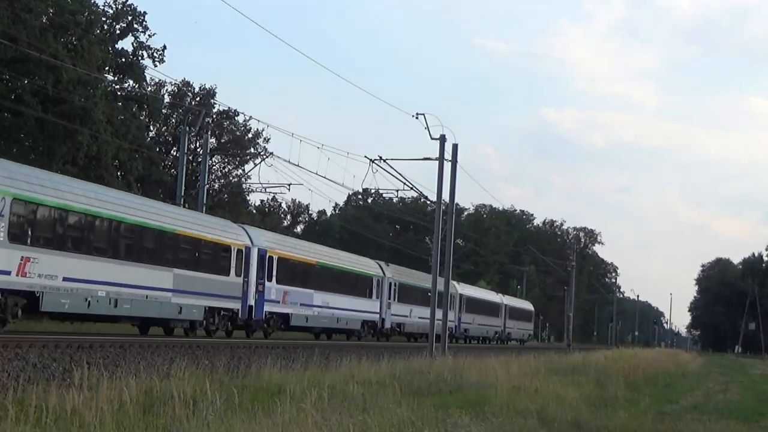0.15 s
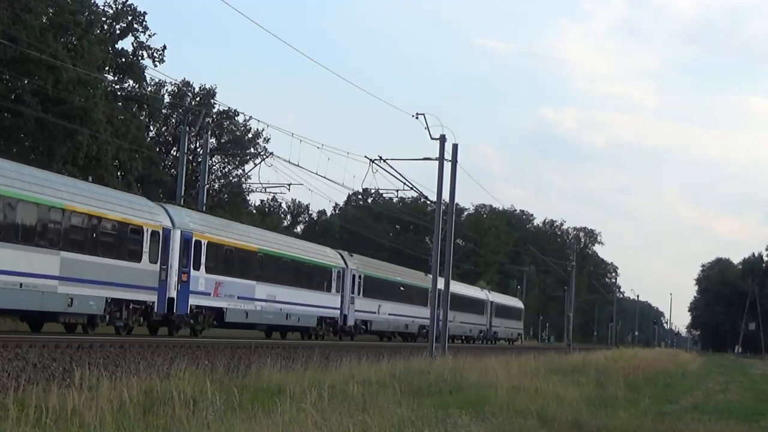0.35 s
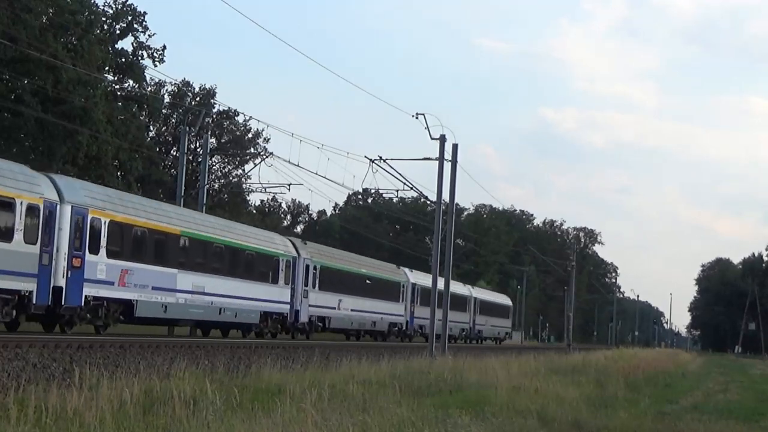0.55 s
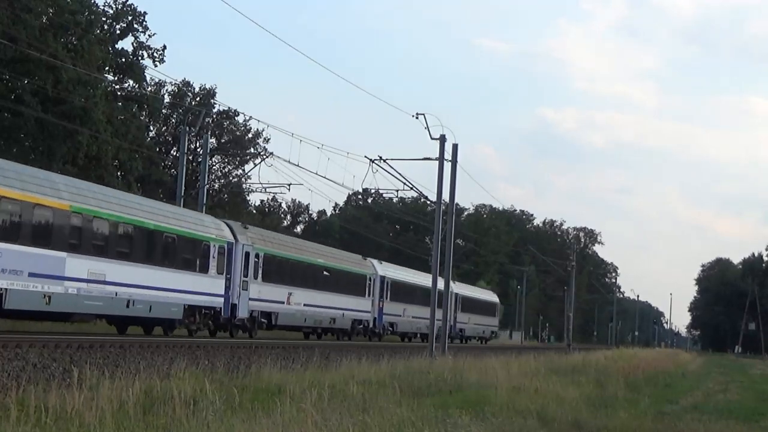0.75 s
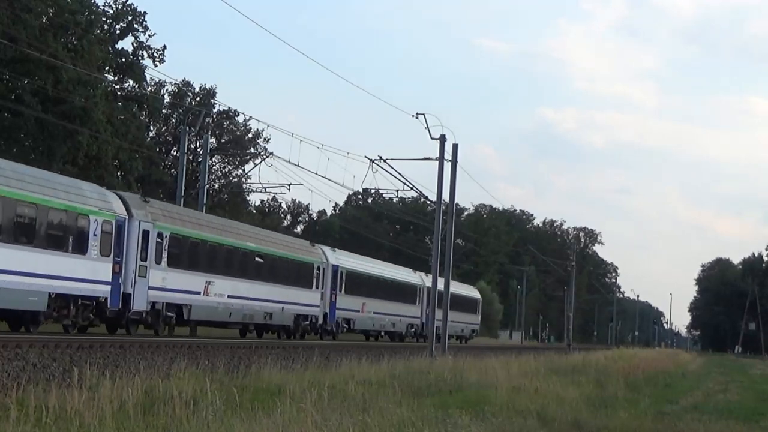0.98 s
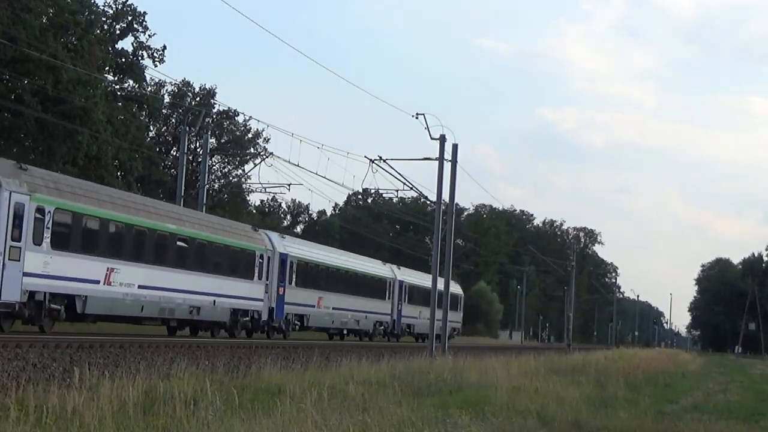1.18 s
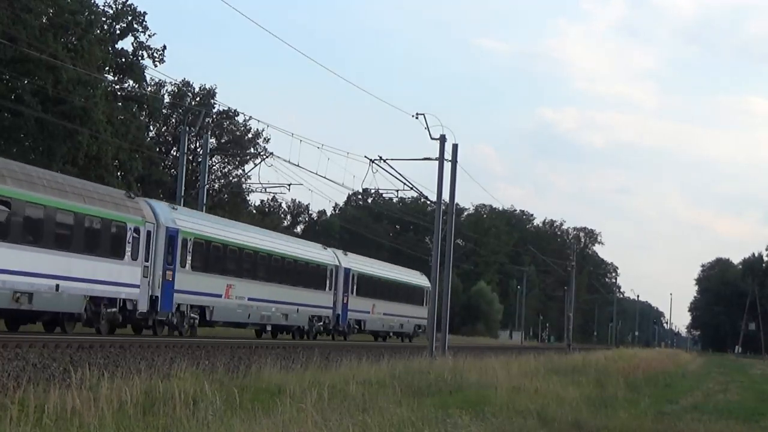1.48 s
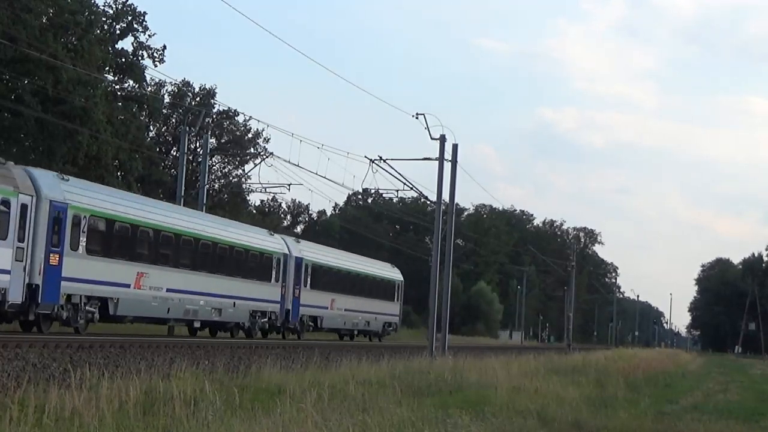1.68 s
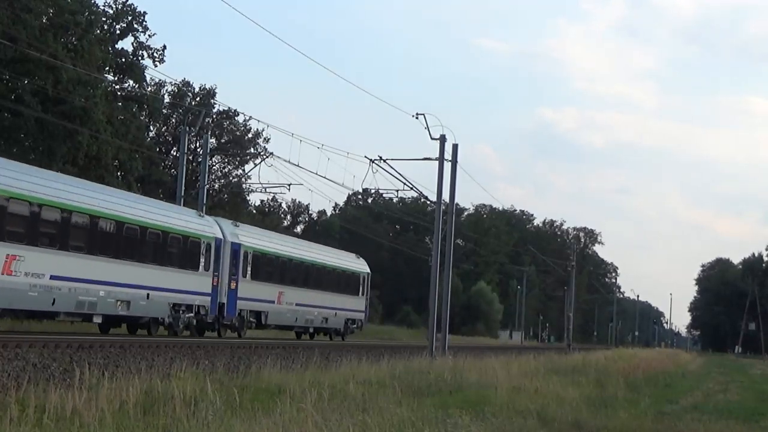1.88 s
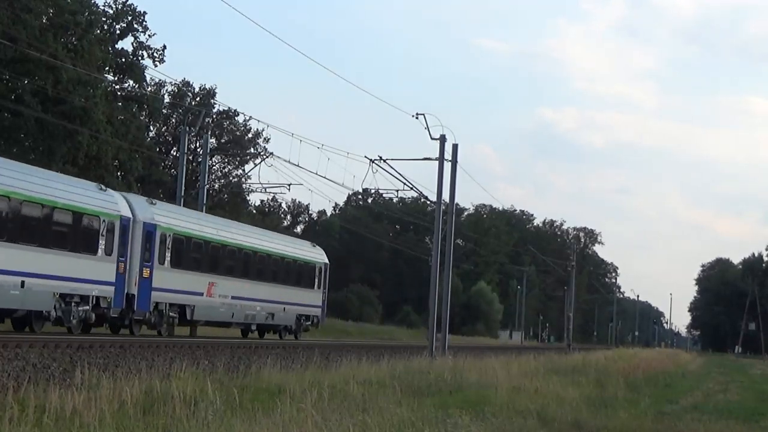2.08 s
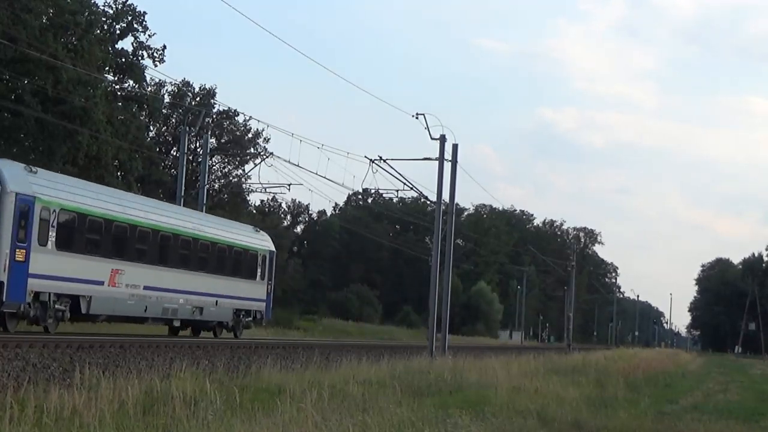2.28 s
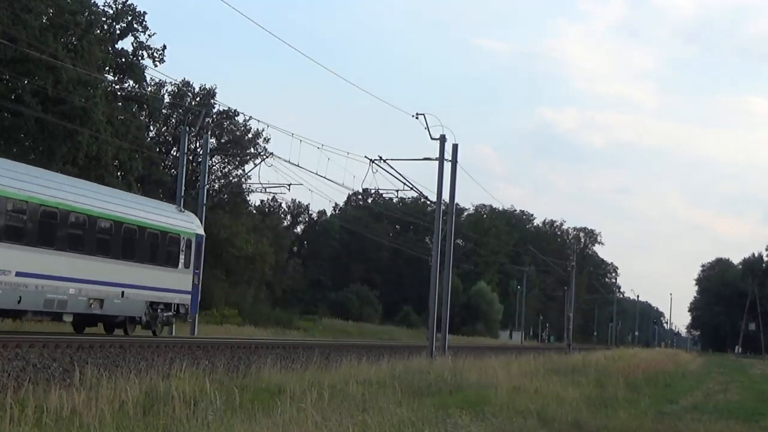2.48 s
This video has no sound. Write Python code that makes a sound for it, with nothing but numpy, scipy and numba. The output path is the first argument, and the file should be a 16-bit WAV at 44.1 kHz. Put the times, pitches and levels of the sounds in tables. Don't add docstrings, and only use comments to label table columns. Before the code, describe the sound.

Passenger coaches speed past close by outdoors, already loud at 0 s and roaring through to about 2.6 s. The bright, hissing wheel and rail noise has little deep rumble. Wheelsets ring metallically every tenth of a second or so, slightly falling in pitch, with rough grinding surges near 0.4, 1.0 and 2.0 s. Quick scuffs flutter throughout; air hisses strongest around 1.2-1.4 s. Stereo drifts left late, without silence.

```python
import sys
import numpy as np
from scipy import signal
from scipy.fft import rfft, irfft, next_fast_len
from scipy.io import wavfile
from scipy.ndimage import uniform_filter1d
from numba import njit

SR = 44100
rng = np.random.default_rng(int(sys.argv[2]) if len(sys.argv) > 2 else 0)


def transcribe(u):
    v = np.clip(np.atleast_2d(u).T, -1, 1)
    q = np.round(v * 32767).astype(np.int16)
    wavfile.write(sys.argv[1], SR, q)


def how_loud(loudness_db):
    steps = np.asarray(loudness_db, float) / 20
    return 10 ** steps


N = 116865

SPEED_M_S, TRACK_DISTANCE_M, SOUND_SPEED_M_S = 27.8, 12, 343

# [f/Hz, level/dB]
ROAR_SPECTRUM = [(20, -25.5), (290, -23), (440, -16), (1250, -6), (1700, -2), (2300, -1.5), (5340, -17),
                 (15600, -28.5)]
# [t/s, rail level/dB, wheel disc level/dB]
ROAR_LEVELS = [(0, -32.5, -32.5), (.14, -35, -33.5), (.2, -33, -32.5), (.45, -31, -30), (.62, -33.5, -30.5),
               (.8, -29.5, -30), (1.0, -30.5, -30.5), (1.18, -31, -33.5), (1.4, -30, -28), (1.6, -31, -29),
               (1.95, -30, -30.5), (2.1, -29.5, -30.5), (2.2, -30, -31), (2.33, -27, -31.5),
               (2.5, -29.5, -31.5), (2.65, -30.5, -31)]
ROAR_DB, SWELL_DB, FLICKER_DB, DISC_FLICKER_DB = 9.5, 0.72, 1.1, -0.4
CROSSOVER_HZ, MODAL_TOP_HZ = 1360, 3440

# [t/s, low ring f/Hz, low level/dB, high ring f/Hz, high level/dB]
WHEELSETS = [(.03, 1730, -52, 2294, -30), (.18, 1650, -36, 2315, -32.5), (.29, 1647, -28, 2300, -26),
             (.43, 1624, -25.5, 2327, -24.5), (.54, 1583, -26, 2245, -30), (.65, 1520, -26, 2104, -28),
             (.74, 1610, -34, 2460, -29), (.83, 1740, -26, 2170, -52), (.95, 1620, -24, 2390, -33),
             (1.07, 1598, -25.5, 2270, -32), (1.16, 1620, -30, 2255, -29), (1.33, 1580, -29, 2275, -28.5),
             (1.47, 1550, -29.5, 2155, -30), (1.61, 1564, -24, 2154, -30), (1.75, 1464, -25, 2245, -26.5),
             (1.88, 1617, -27, 2020, -33), (1.97, 1650, -25.5, 2180, -23.5), (2.08, 1440, -28.5, 2150, -29),
             (2.16, 1495, -27.5, 2394, -30), (2.28, 1380, -29.5, 1970, -29.5),
             (2.39, 1710, -34, 2260, -29.5), (2.50, 1316, -29, 2430, -31.5), (2.60, 1930, -34, 2380, -38)]
RING_WIDTHS = (95, 59)
WHEEL_BEAM_M = 2.36
RING_WAVER, RING_FLUTTER_DB = 0.0086, 1
STEADINESS, STEADY_S = 0.27, 0.021

# [t/s, f/Hz, level/dB]
LONE_MODES = [(.10, 2290, -42), (.17, 2340, -27), (.35, 2070, -29), (.36, 3100, -29), (.39, 2380, -33),
              (.66, 1490, -26), (.84, 1750, -28), (.55, 3000, -30.5), (.90, 2410, -28), (1.10, 2190, -30),
              (1.23, 2210, -25.5), (1.41, 2190, -33), (1.51, 2130, -27), (1.57, 2930, -35),
              (2.07, 2170, -31), (2.05, 2720, -30), (2.17, 1540, -26), (2.31, 2300, -28.5),
              (2.54, 2420, -29), (2.62, 1960, -31), (.39, 6400, -39), (1.03, 7400, -45), (1.22, 8900, -42),
              (1.96, 7200, -43), (.42, 4100, -33), (.44, 4400, -41), (.46, 3000, -27), (.51, 952, -32.5),
              (.79, 4150, -34), (.80, 650, -41), (.87, 3660, -38), (.89, 4400, -31), (1.00, 4350, -37),
              (1.02, 3900, -34), (1.04, 4100, -37), (1.05, 295, -45), (1.31, 3950, -39), (1.33, 332, -48.5),
              (1.45, 2790, -30), (1.54, 3300, -33), (1.70, 2740, -29), (1.70, 910, -38.5),
              (1.79, 790, -35.5), (1.85, 2800, -30), (1.92, 3280, -32), (1.95, 755, -35), (1.96, 2940, -37),
              (2.01, 4000, -36), (2.25, 2840, -33), (2.28, 980, -39), (2.35, 760, -41.5), (2.40, 3340, -32),
              (2.57, 3240, -29), (2.57, 450, -39), (2.58, 773, -41)]
FLARE_BEAM_M, FLARE_WIDTH = 1.14, 0.023

# [t/s, level/dB, beam/m, brightness/(dB per octave)]
ROUGH_BOGIES = [(.24, -29, 5.5, -8), (.42, -26.5, 3.7, 0), (.56, -36.5, 2.3, 26), (.80, -27, 3.6, -4),
                (.88, -35.5, 2.2, 7), (1.03, -24.5, 5.2, 6.5), (1.38, -27.5, 7.9, -3),
                (1.53, -38, 2.5, -17), (1.72, -32.5, 2.8, -32), (1.96, -26, 5, -1.5), (2.25, -26, 1.4, -22),
                (2.41, -30.5, 2.3, -3), (2.59, -26, 6.8, -1)]
# [f/Hz, width/Hz, level/dB]
GRIND_MODES = [(2660, 280, -4), (2977, 100, -4), (3520, 850, -2), (4155, 120, -7), (4710, 150, -10.5),
               (5550, 1300, -8), (6950, 600, -18.5)]
GRIND_FLUTTER_DB, BOGIE_SHUDDER_DB = 1.14, 1.37

# [t/s, scuff level/dB, hiss level/dB]
TREAD_STRIKES = [(.385, -42, -55), (.44, -42, -43), (.545, -34, -49), (.605, -38, -52), (0.701, -34, -45),
                 (.790, -35.5, -54), (.855, -33, -46), (.880, -45, -51), (.945, -36, -48),
                 (1.023, -32, -41), (1.121, -33.5, -42), (1.205, -35, -41), (1.265, -33, -36),
                 (1.335, -40, -39), (1.370, -38, -38), (1.440, -44, -44), (1.540, -38, -45),
                 (1.645, -38, -47), (1.775, -40, -41), (1.830, -35, -48), (1.95, -45, -53),
                 (2.238, -39.5, -48), (2.370, -38, -40), (2.520, -40, -50), (2.630, -41, -50)]
STRIKE_RISE_S, STRIKE_FALL_S, STRIKE_DB = 0.0052, 0.019, 9.5
SCUFF_HZ, SCUFF_WIDTH_HZ = 5630, 4200
HISS_HZ, HISS_WIDTH_HZ = 11400, 6700

# [t/s, level/dB, beam/m, centre f/Hz]
AIR_LEAKS = [
    (.66, -41.5, 3.4, 9000),
    (1.13, -39, 5, 9900),
    (1.24, -32.5, 2.6, 9700),
    (1.27, -43, 2, 12500),
    (1.36, -36, 2.9, 10100),
    (1.75, -51, 3.1, 9250),
    (2.30, -37, 5.0, 8650),
]
LEAK_WIDTH_HZ, LEAK_PAN_DB, LEAK_FLUTTER_DB = 6900, -3.5, 2

# [f/Hz, left minus right level/dB]
PORT_LEVELS = [(60, 5.5), (380, 0.5), (900, 6.5), (2400, 5), (3800, 6), (6000, 4.5), (8800, -1.5),
               (14000, 1.5)]
# [f/Hz, likeness/(0 to 1)]
PORT_COHERENCE = [(30, 0.61), (120, 0.7), (450, 0.99), (1300, 0.84), (2500, 0.82), (5000, 0.74),
                  (8000, 0.4), (9900, 0.84), (11700, 0.7)]
# [f/Hz, phase/rad]
PORT_LEAD = [(60, 0.57), (700, -0.28), (1200, 0.36), (1500, -0.88), (3300, -0.16), (6500, -0.69),
             (9000, -0.13), (15300, -.1)]
# [t/s, left minus right level/dB]
TRAIN_DRIFT = [(0, -0.5), (.6, 1.3), (1.3, 1), (1.8, 1.1), (2.2, 3), (2.65, 1.5)]
# [f/Hz, level/dB]
CAPSULE_RESPONSE = [(6000, 0.5), (8200, 3), (9900, 3.2), (10500, -0.5), (12500, -4), (14000, -2.5),
                    (15600, -5.5)]


def level(x, db):
    return x * how_loud(db) / np.sqrt(np.mean(x ** 2))


def by_hz(table, hz):
    table = np.array(table, float)
    return np.interp(np.log(np.maximum(hz, 1)), np.log(table[:, 0]), table[:, 1])


def walk(rate):
    hold = int(SR / rate)
    w = np.repeat(rng.standard_normal(N // hold + 1), hold)
    w = uniform_filter1d(uniform_filter1d(w, hold), hold)[:N]
    return w / w.std()


def passing(t, passes_s, beam_m):
    along_m = SPEED_M_S * (t - passes_s)
    recession_m_s = SPEED_M_S * along_m / np.hypot(along_m, TRACK_DISTANCE_M)
    pitch = 1 / (1 + recession_m_s / SOUND_SPEED_M_S)
    gain = (1 + (along_m / beam_m) ** 2 / 2) ** -2
    return pitch, gain


@njit
def svf(x, hz, width, sr):
    y = np.empty_like(x)
    for c in range(x.shape[0]):
        band, low = 0., 0.
        for i in range(x.shape[1]):
            g = np.tan(np.pi * hz[i] / sr)
            damping = width / hz[i]
            v = (band + g * (x[c, i] - low)) / (1 + g * (g + damping))
            band = 2 * v - band
            low = low + 2 * g * v
            y[c, i] = damping * v
    return y


def resonance(hz, width_hz):
    hz = np.clip(hz * np.ones(N), 20, SR / 2.3)
    noise = rng.standard_normal((2, N))
    narrow = svf(noise, hz, 1. * width_hz, 1. * SR)
    return level(svf(narrow, hz, 5.7 * width_hz, 1. * SR), 0)


def ring(hz, width_hz):
    x = resonance(hz, width_hz)
    k = int(STEADY_S * SR)
    power = uniform_filter1d(uniform_filter1d(x ** 2, k), k)
    return level(x / power ** (STEADINESS / 2), 0)


def rails(t):
    hz = np.fft.rfftfreq(N, 1 / SR)
    colour = how_loud(by_hz(ROAR_SPECTRUM, hz))
    noise = rfft(rng.standard_normal((2, N))) * colour / np.sqrt(np.mean(colour ** 2))
    s, rail_db, disc_db = np.array(ROAR_LEVELS).T
    swell = walk(rate=31)
    out = 0
    for centre in 20 * 2 ** np.arange(0, 10, 1 / 8):
        octaves = np.log2(np.maximum(hz, 20) / centre)
        share = np.cos(np.pi / 2 * np.clip(8 * octaves, -1, 1)) ** 2
        disc = 1 / (1 + (CROSSOVER_HZ / centre) ** 4)
        modal = 1 / (1 + (centre / MODAL_TOP_HZ) ** 2)
        db = ROAR_DB + np.interp(t, s, rail_db + disc * (disc_db - rail_db))
        db = db + (1 - modal) * SWELL_DB * swell
        db = db + modal * (FLICKER_DB + disc * DISC_FLICKER_DB) * walk(rate=15)
        out = out + irfft(noise * share, next_fast_len(N))[:, :N] * how_loud(db)
    return out


def wheels(t):
    out = 0
    for s, low_hz, low_db, high_hz, high_db in WHEELSETS:
        pitch, gain = passing(t, s, WHEEL_BEAM_M)
        for hz, db, width_hz in zip((low_hz, high_hz), (low_db, high_db), RING_WIDTHS):
            waver = 1 + RING_WAVER * walk(rate=18)
            loudness = gain * how_loud(db + RING_FLUTTER_DB * walk(rate=32))
            out = out + loudness * ring(hz * pitch * waver, width_hz)
    return out


def flares(t):
    out = 0
    for s, hz, db in LONE_MODES:
        pitch, gain = passing(t, s, FLARE_BEAM_M)
        out = out + gain * how_loud(db) * ring(hz * pitch, FLARE_WIDTH * hz + 40)
    return out


def bogies(t):
    out = 0
    lowest_hz = GRIND_MODES[0][0]
    for s, db, beam_m, tilt_db in ROUGH_BOGIES:
        pitch, gain = passing(t, s, beam_m)
        grind = 0
        for hz, width_hz, mode_db in GRIND_MODES:
            mode_db = mode_db + tilt_db * np.log2(hz / lowest_hz) + GRIND_FLUTTER_DB * walk(rate=14)
            grind = grind + how_loud(mode_db) * resonance(hz * pitch, width_hz)
        out = out + gain * how_loud(BOGIE_SHUDDER_DB * walk(rate=24)) * level(grind, db)
    return out


def treads(t):
    s, scuff_db, hiss_db = np.array(TREAD_STRIKES).T
    since = np.maximum(t - s[:, None] + STRIKE_RISE_S, 0)
    shape = (1 - np.exp(-since / STRIKE_RISE_S)) * np.exp(-since / STRIKE_FALL_S)
    scuff = how_loud(scuff_db + STRIKE_DB) @ shape * resonance(SCUFF_HZ, SCUFF_WIDTH_HZ)
    hiss = how_loud(hiss_db + STRIKE_DB) @ shape * resonance(HISS_HZ, HISS_WIDTH_HZ)
    return scuff + hiss


def leaks(t):
    out = 0
    for s, db, beam_m, hz in AIR_LEAKS:
        pitch, gain = passing(t, s, beam_m)
        flutter = LEAK_FLUTTER_DB * walk(rate=23)
        out = out + gain * how_loud(db + flutter) * resonance(hz * pitch, LEAK_WIDTH_HZ)
    return out


def ports(pair):
    hz = np.fft.rfftfreq(N, 1 / SR)
    common, differing = rfft(pair)
    like = np.clip(by_hz(PORT_COHERENCE, hz), 0, 1)
    mid = common * np.sqrt((1 + like) / 2)
    side = differing * np.sqrt((1 - like) / 2)
    tilt = how_loud(by_hz(PORT_LEVELS, hz) / 2) * np.exp(.5j * by_hz(PORT_LEAD, hz))
    return irfft(np.array([(mid + side) * tilt, (mid - side) / tilt]), N)


def pan(db):
    return how_loud(np.array([[.5], [-.5]]) * db)


def scene():
    t = np.arange(N) / SR
    train = ports(rails(t) + wheels(t) + flares(t) + bogies(t) + treads(t))
    drift_db = np.interp(t, *np.array(TRAIN_DRIFT).T)
    return pan(drift_db) * train + pan(LEAK_PAN_DB) * ports(leaks(t))


def band_limit(x):
    return signal.sosfilt(signal.butter(12, 15800, fs=SR, output="sos"), x)


def record(dry):
    hz = np.fft.rfftfreq(N, 1 / SR)
    headroom, top_hz = .95, 15830
    coloured = irfft(rfft(dry) * how_loud(by_hz(CAPSULE_RESPONSE, hz)), N)
    rounded = headroom * np.tanh(coloured / headroom)
    mix = irfft(rfft(rounded) * (hz < top_hz), N)
    return band_limit(mix)


dry = scene()
out = record(dry)
transcribe(out)
```